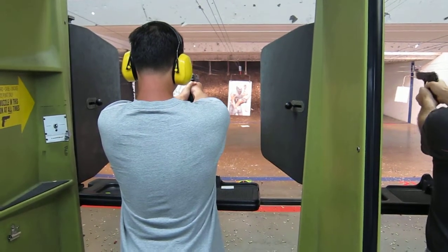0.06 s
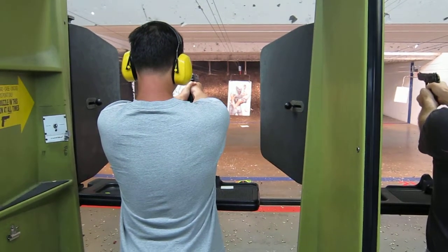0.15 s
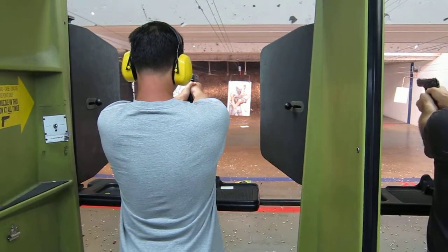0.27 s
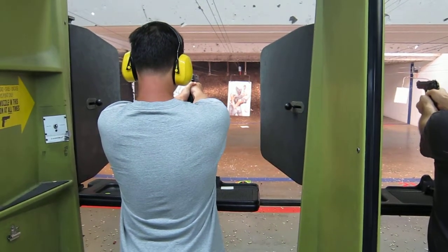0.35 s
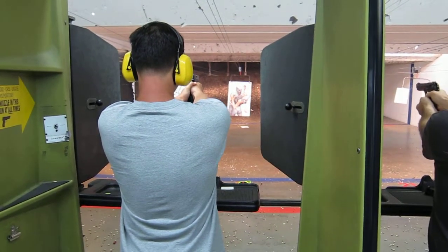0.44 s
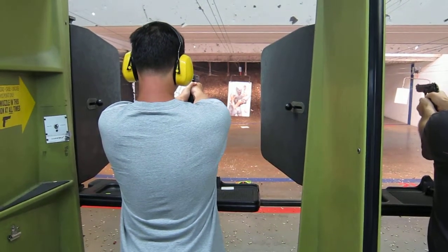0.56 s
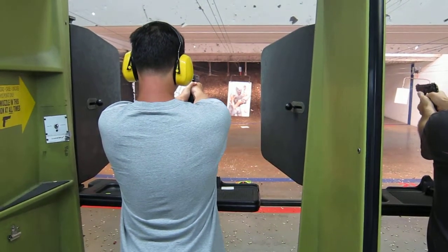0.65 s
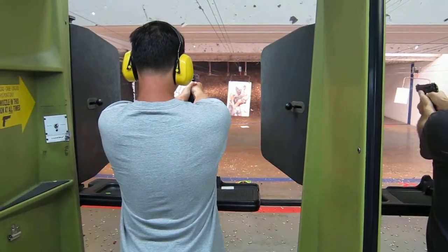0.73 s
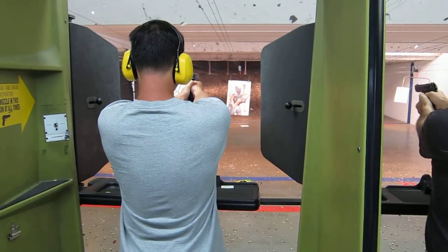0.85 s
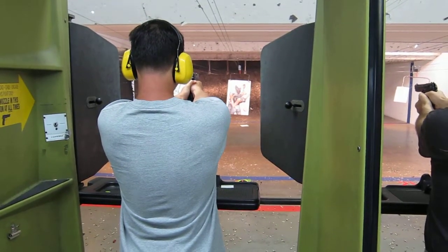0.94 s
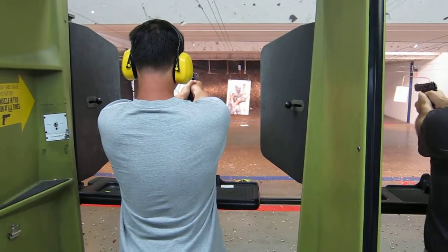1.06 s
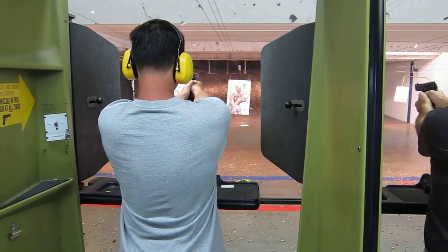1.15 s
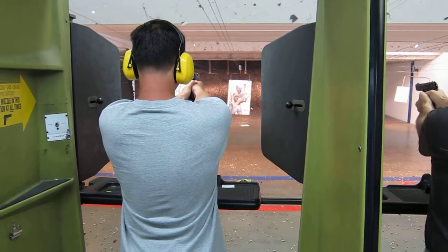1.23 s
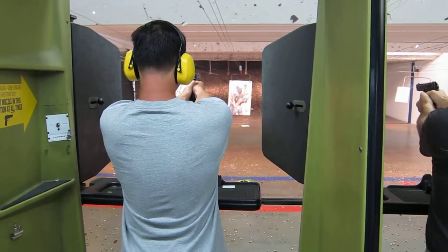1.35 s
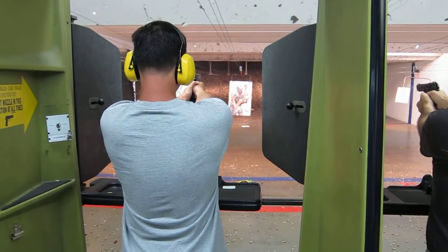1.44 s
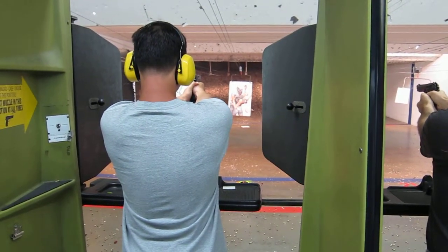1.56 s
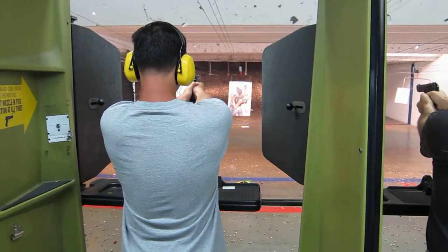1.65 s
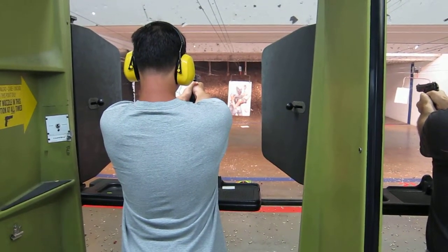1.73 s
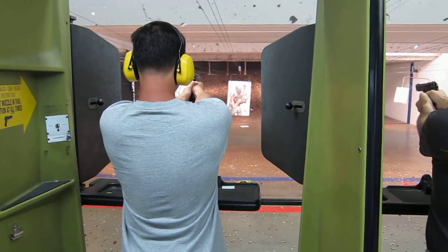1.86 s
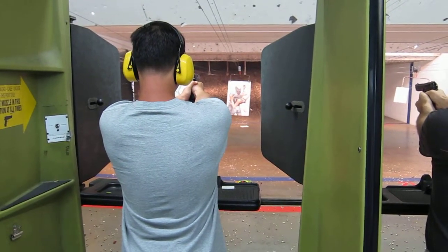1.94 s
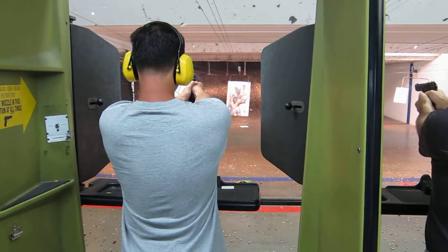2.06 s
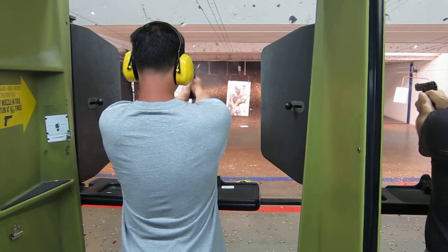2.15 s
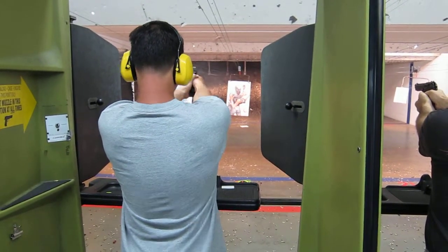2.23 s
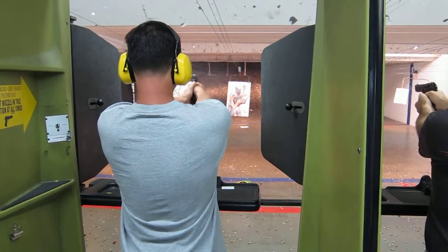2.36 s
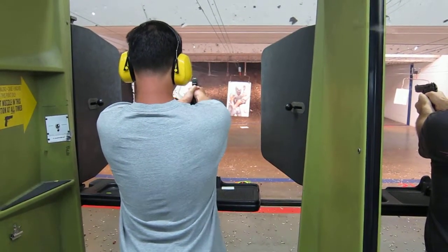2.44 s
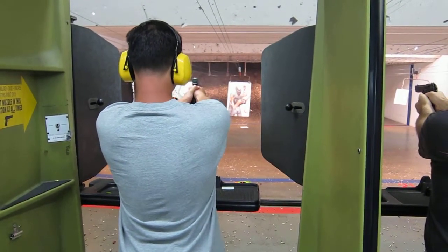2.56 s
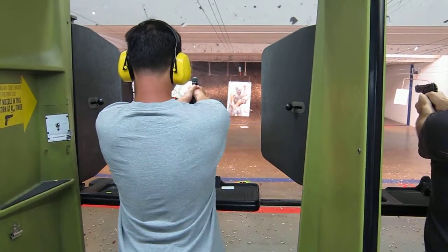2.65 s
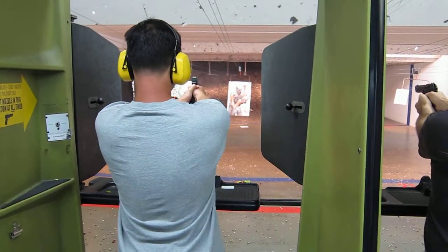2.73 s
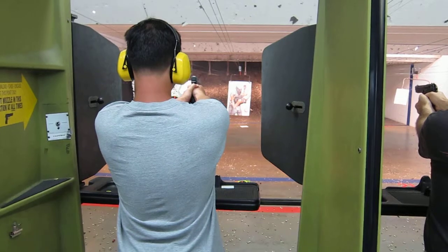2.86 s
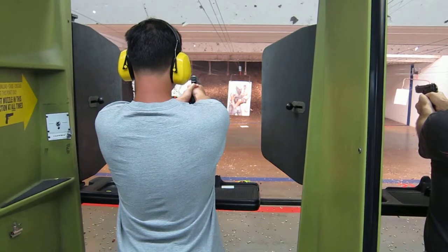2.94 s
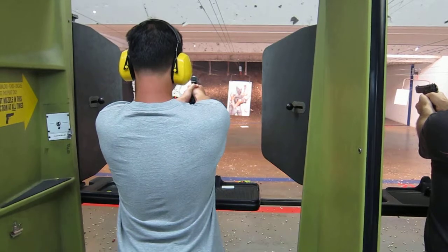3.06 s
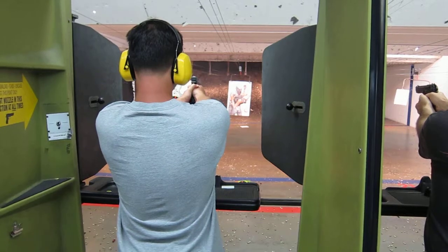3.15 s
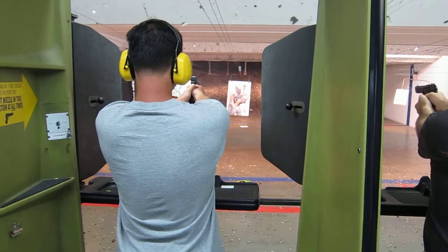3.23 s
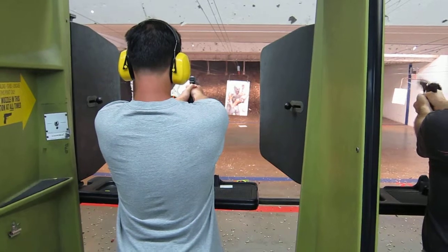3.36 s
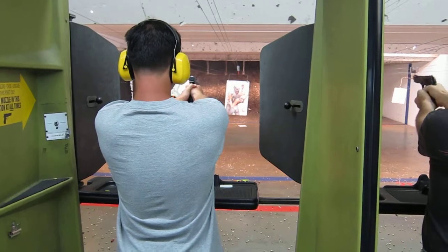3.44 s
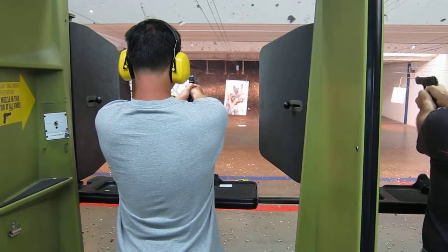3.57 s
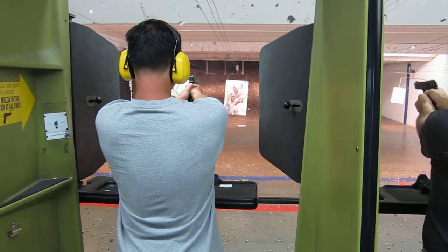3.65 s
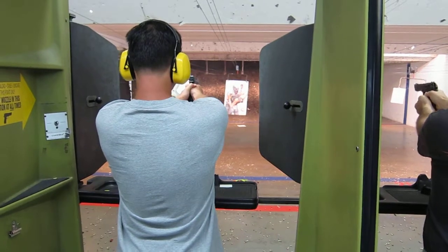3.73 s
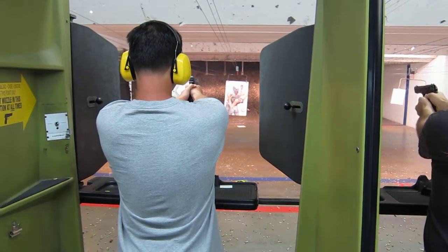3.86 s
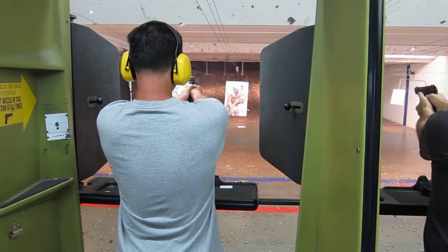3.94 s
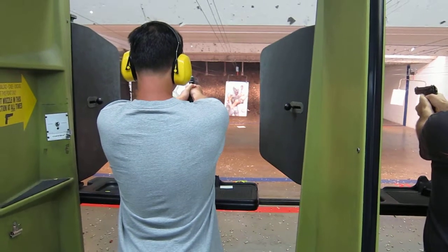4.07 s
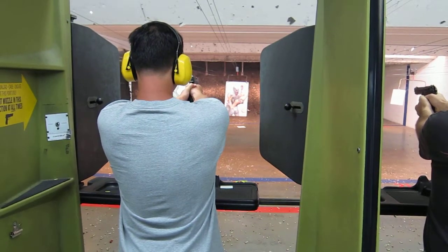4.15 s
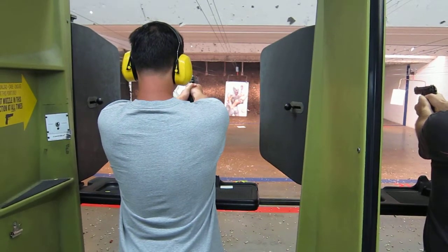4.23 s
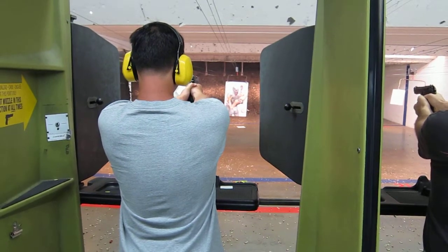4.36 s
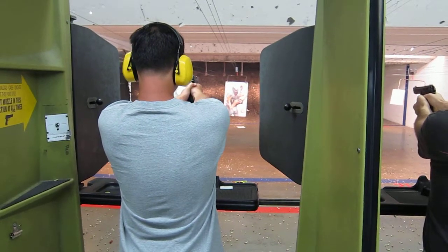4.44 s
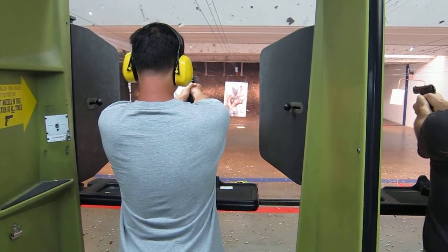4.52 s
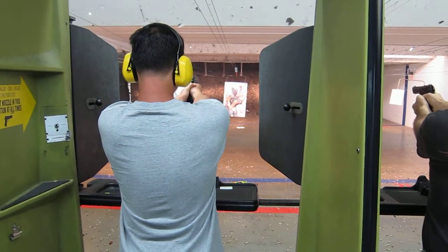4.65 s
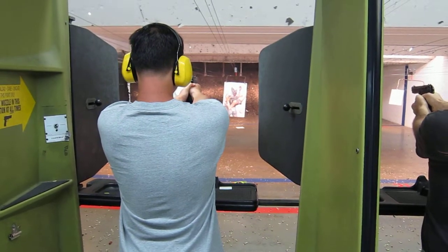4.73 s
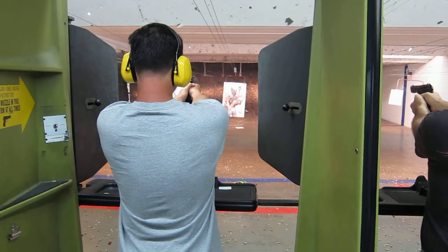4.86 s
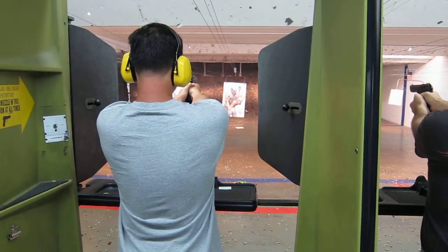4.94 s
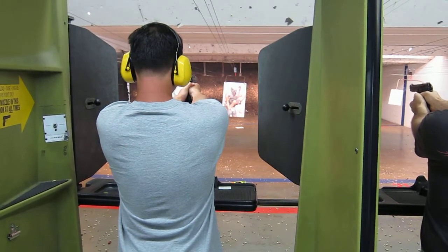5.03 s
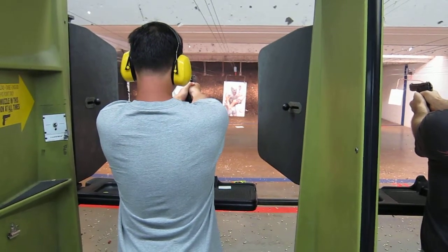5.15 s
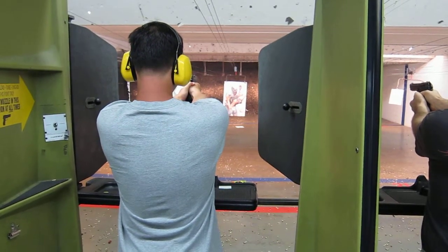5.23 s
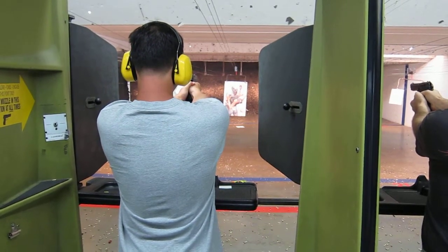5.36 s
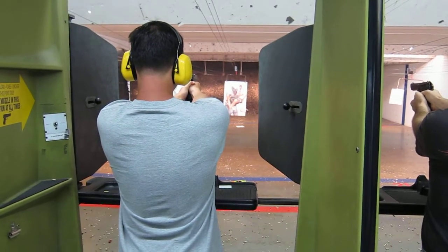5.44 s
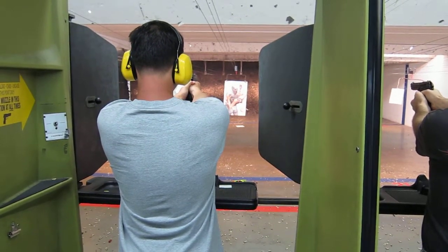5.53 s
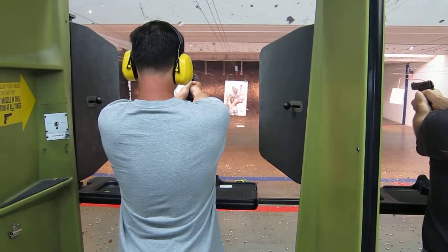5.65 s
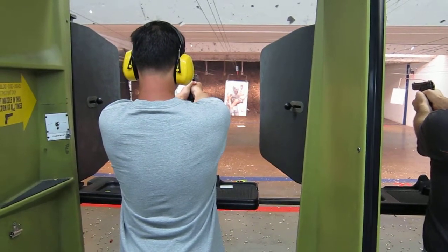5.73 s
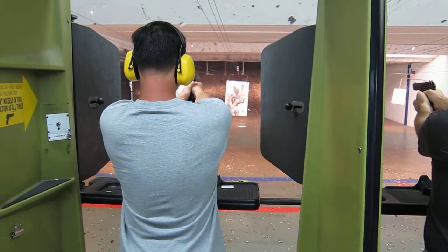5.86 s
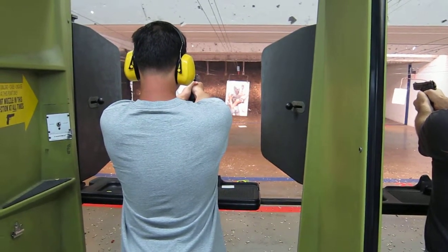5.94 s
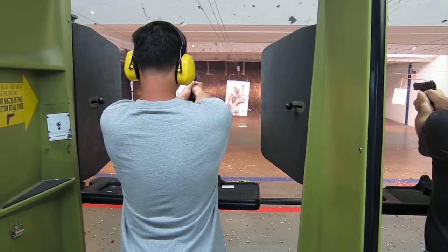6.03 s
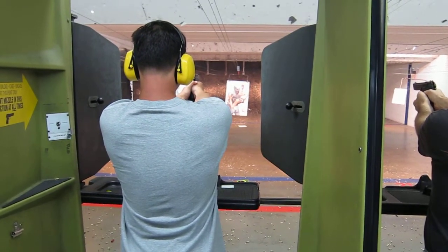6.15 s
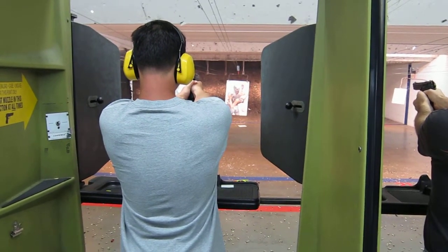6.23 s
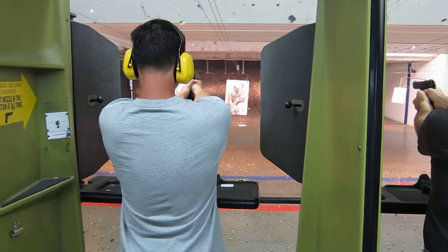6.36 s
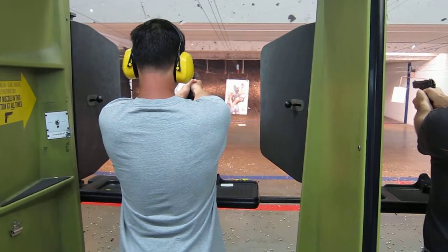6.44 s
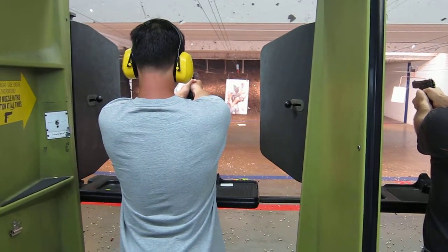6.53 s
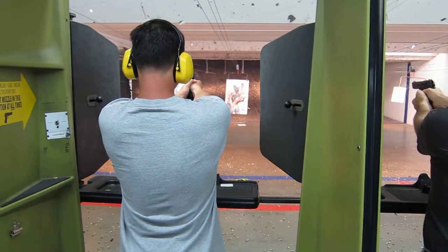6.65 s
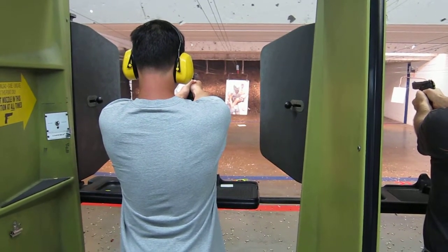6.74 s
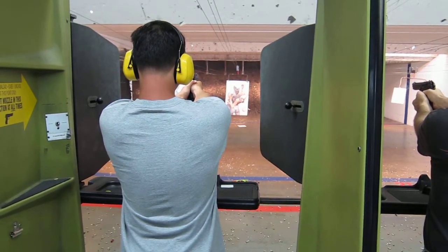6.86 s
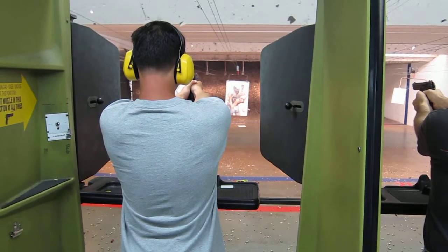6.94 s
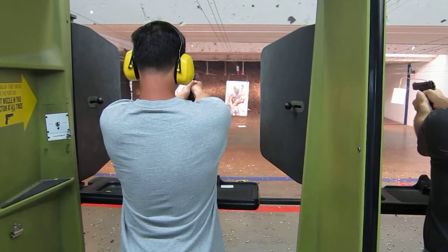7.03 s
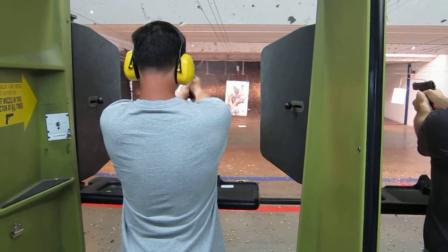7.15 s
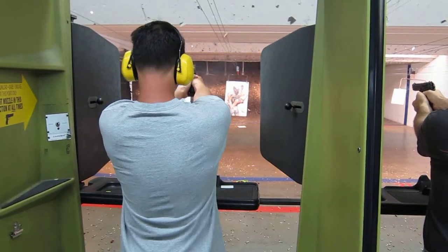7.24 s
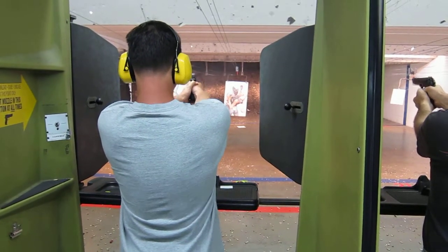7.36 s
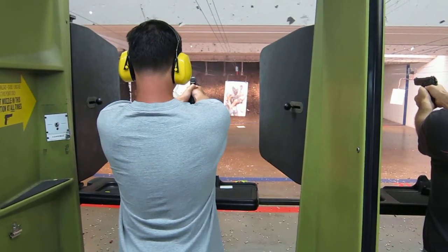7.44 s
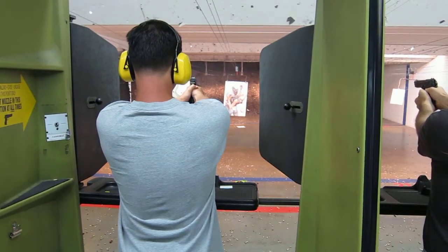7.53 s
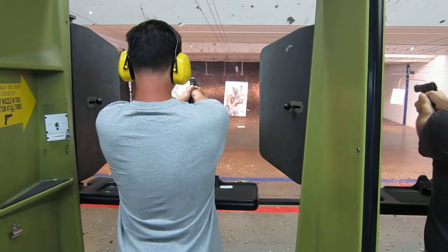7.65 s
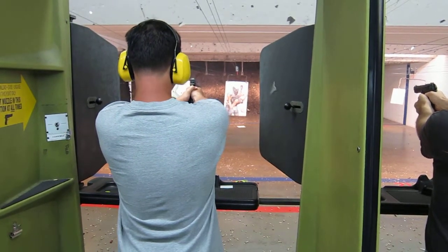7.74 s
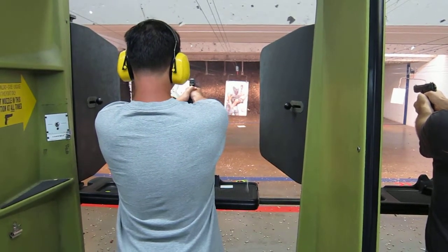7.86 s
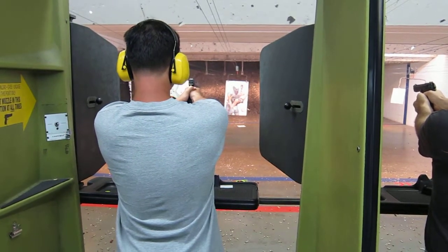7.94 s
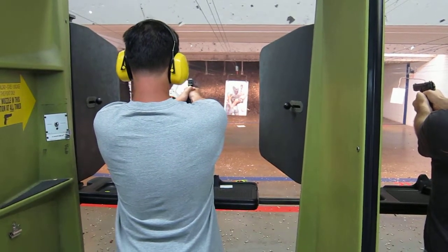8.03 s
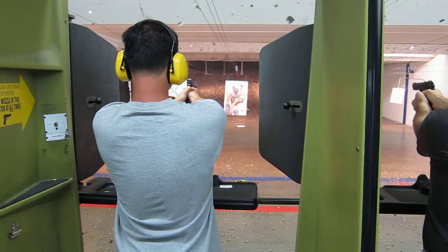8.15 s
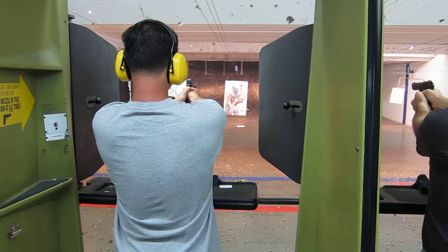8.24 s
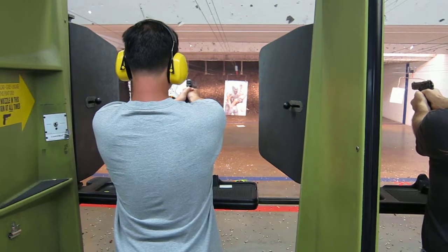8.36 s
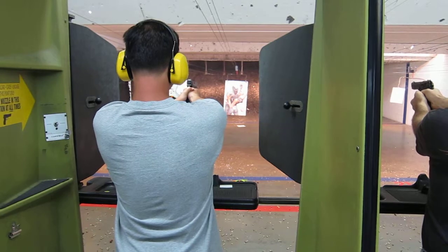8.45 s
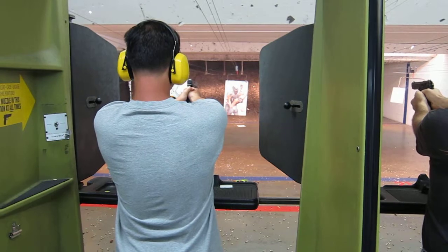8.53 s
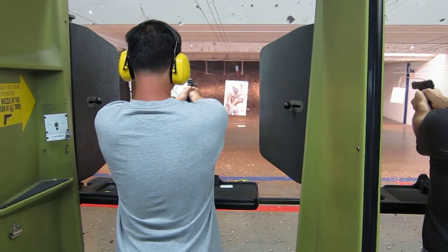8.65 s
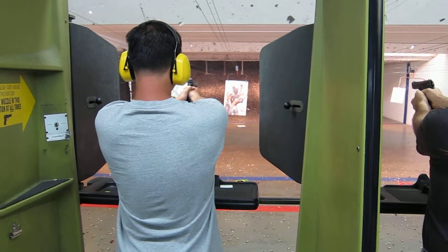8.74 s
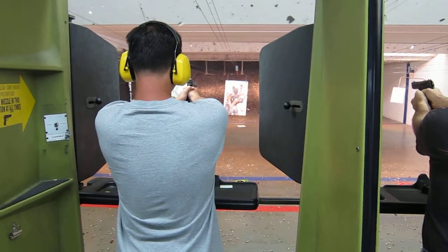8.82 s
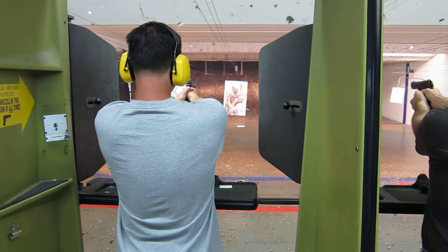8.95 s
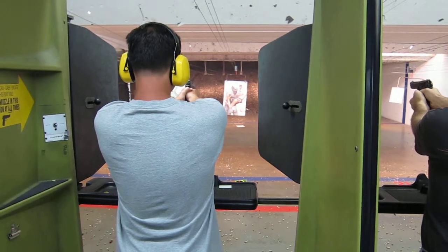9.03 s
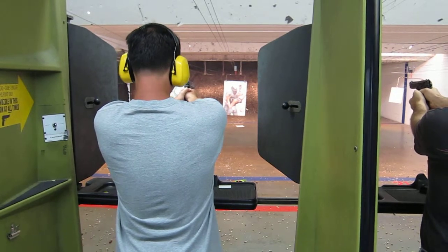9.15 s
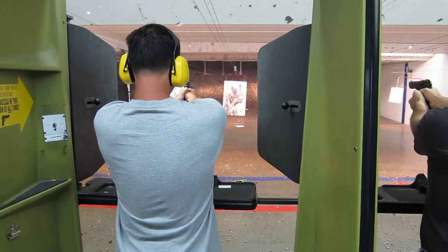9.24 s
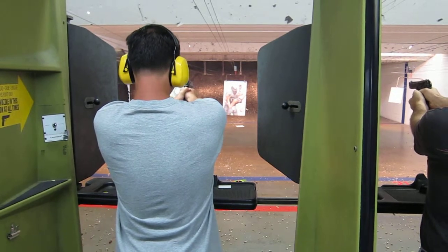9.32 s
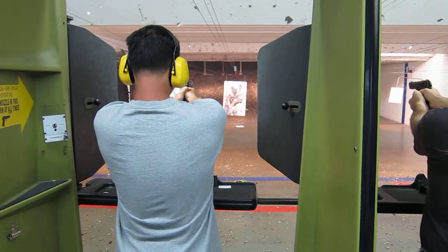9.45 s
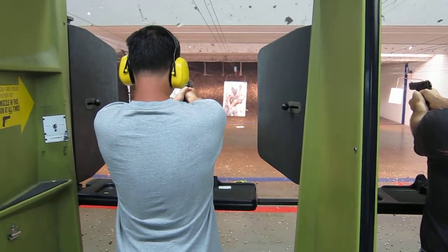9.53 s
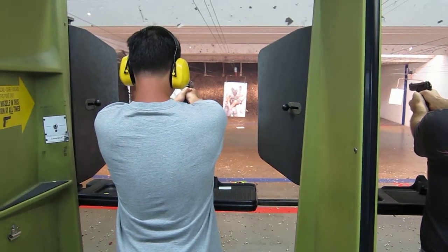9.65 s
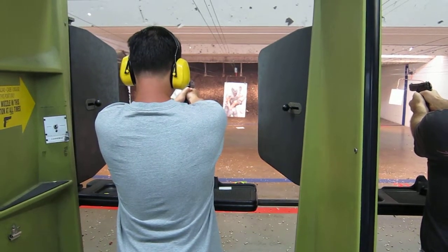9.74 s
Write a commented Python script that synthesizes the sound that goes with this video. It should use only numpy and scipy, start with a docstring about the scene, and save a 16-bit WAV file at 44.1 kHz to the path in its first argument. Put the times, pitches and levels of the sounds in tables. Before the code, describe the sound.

Saturated gunshots, two in close pairs, boom and ring through a hard hall over ventilation hum, spent cases ticking, a clunk and a motor whir.

```python
"""The hall is already roaring from a pistol shot as we join, just behind one booth of a concrete indoor range.
Each blast is a shock pulse, bursts of shaped noise off the booth, and a hall tail dying at two speeds.
Steady noise and a fan tone make the ventilation; spent brass ticks and rings on the floor and knocks the booth.
Something clunks, a low motor hums, and a target carrier whirs up to speed as noise and unsteady tones.
Loud peaks saturate the microphone, and its gain ducks and creeps back."""
import sys
import numpy as np
from scipy import signal
from scipy.fft import rfft, irfft, next_fast_len
from scipy.io import wavfile

SR = 44100
rng = np.random.default_rng(int(sys.argv[2]) if len(sys.argv) > 2 else 0)


def unload_audio(sound):
    """Save the sound as a 16-bit wav file, at the path given as the first command line argument."""
    columns = np.transpose(np.atleast_2d(sound))
    # keep every value between -1 and 1, then stretch to whole-number steps
    steps = np.round(np.clip(columns, -1, 1) * 32767)
    wavfile.write(sys.argv[1], SR, steps.astype(np.int16))


N = 431738

# Pistol shots: (time [s], muzzle blast [dB], crack off the booth [dB], hall roar [dB], lingering echo [dB])
SHOTS = [(-.06, 6, 18, 11.5, -7.5), (2.1569, 14, 18, 10.5, -4.5), (3.3852, -1, 23, 11.5, -10.5),
         (3.56, -6, 7, 10.5, -8.5), (7.1653, 6, 25.5, 9.5, -11), (7.335, 4, 22, 8, -1),
         (9.6844, 18, -2, 10, -12)]
# Colour of a shot's first reflections: (frequency [Hz], relative level [dB per Hz])
CRACK_SPECTRUM = [(300, -20), (1200, -19), (2500, -5), (4000, 1), (7000, -2.5), (12000, -13), (16000, -9)]
# Colour of the booth's clatter: (frequency [Hz], relative level [dB per Hz])
BOOTH_SPECTRUM = [(30, -13), (150, -0.5), (400, 0), (900, 4), (1700, -1), (3500, 0), (6500, -1),
                  (11000, -27), (16000, -15.5)]
# Colour of the hall: (frequency [Hz], relative level [dB per Hz])
HALL_SPECTRUM = [(25, -25), (100, -22.5), (200, -11), (330, -2.5), (500, -3.5), (750, -1.5), (1000, -4),
                 (1300, -5.5), (1680, -12), (2050, -12), (2500, -9), (4000, -10), (6000, -11), (10000, -24),
                 (16000, -28.5)]
# Decay of the hall's roar: (frequency [Hz], t60 [s])
ROAR_T60 = [(60, 2.25), (300, 2.086), (800, 1.96), (2000, 1.756), (4000, 1.54), (6500, 1.37), (12000, 0.99)]
# Decay of the echo that lingers down range: (frequency [Hz], t60 [s])
LINGER_T60 = [(60, 5), (350, 4.8), (900, 4.67), (2000, 3.57), (4000, 2.72), (7000, 1.36), (12000, .8)]
# Standing waves between the walls: (frequency [Hz], width [Hz], level over the echo [dB])
STANDING_WAVES = [(274.6, 3.6, 7.5), (367.4, 6.7, 8.5), (643.5, 12, 0.5)]
# Left-right likeness of diffuse sound: (frequency [Hz], coherence [-1 to 1])
COHERENCE = [(40, 0.96), (130, 1), (300, 0.99), (690, 0.95), (1030, 0.87), (1400, 0.6), (2000, 0.37),
             (3400, 0.087), (6000, -0.1), (12000, -0.11)]
# Colour of the ventilation: (frequency [Hz], relative level [dB per Hz])
VENT_SPECTRUM = [(25, -7), (60, -13), (140, -10.5), (380, -11), (700, -14.5), (1000, -18.5), (1650, -23),
                 (2200, -23), (3100, -30.5), (5700, -35.5), (10000, -46.5), (16000, -60)]
# Spent cases landing on concrete: (time [s], tick level [dB], ring frequency [Hz], ring level [dB])
LANDINGS = [(.778, -40, 10500, -29.5), (1.132, -36, 10500, -41), (1.423, -51, 10500, -50),
            (4.36, -72, 7270, -42), (4.391, -64, 10900, -43), (4.548, -63, 11400, -48),
            (4.896, -62, 10050, -55), (5.248, -66, 11400, -53), (5.32, -72, 7620, -55),
            (5.525, -66, 11450, -51), (6.528, -72, 13260, -64), (6.679, -64, 9990, -57),
            (8.093, -32, 10500, -33), (8.246, -37, 10900, -23.5), (8.45, -35, 11000, -49),
            (8.623, -24, 10650, -27), (8.852, -46, 10900, -39), (8.94, -58, 10620, -41)]
# Colour of brass on concrete: (frequency [Hz], relative level [dB per Hz])
TICK_SPECTRUM = [(2000, -34), (7000, -6), (10000, -9), (13000, -4), (16000, -12)]
# A hard landing stops the ring, a glancing one leaves it free: (tick level [dB], ring t60 [s])
RING_T60 = [(-50, 0.28), (-64, 0.93), (-72, 1.6)]
# Cases against the booth: (time [s], level [dB], pitch of the first knock [Hz], rattle length [s])
KNOCKS = [(1.132, -40, 5400, .002), (1.316, -39, 5350, .002), (8.245, -12.5, 4830, .002),
          (8.447, -20.5, 4520, .007), (8.603, -24, 4430, .027), (8.852, -31, 5160, .002)]
# Colour of a knock's click: (frequency [Hz], relative level [dB per Hz])
KNOCK_SPECTRUM = [(400, -18), (2000, 7), (4500, 4.5), (7000, -2.5), (11000, -19), (16000, -13)]
# Notes of the rolling cases, which touch in turn: (frequency [Hz])
ROLL_NOTES = [11080, 9950, 7600, 13350, 10020, 13300]
# Colour of the clunk: (frequency [Hz], relative level [dB per Hz])
CLUNK_SPECTRUM = [(30, -22), (100, -13), (200, -13), (400, -8), (800, -21), (1400, -11.5), (3000, -19),
                  (6000, -21), (11000, -30.5), (16000, -40)]
# The metal fitting that the clunk rings: (frequency [Hz], level before a 3 dB cut [dB], t60 [s])
FITTING_MODES = [(155, -38, 0.75), (220, -27.5, 0.35), (1040, -49, .3), (1270, -50, .25), (1820, -50, .35),
                 (3260, -41.5, 0.96)]
# Runs of the low motor: (start time [s], hold [s], level [dB])
HUM_RUNS = [(6.49, 0.11, -44), (9.2, .35, -44.5)]
# Colour of the carrier's whir: (frequency [Hz], relative level [dB per Hz])
WHIR_SPECTRUM = [(100, -4.5), (400, -9), (1500, -5), (2500, -6), (4500, -6.5), (5700, -7), (7500, -14.5),
                 (12000, -16), (16000, -22)]
# Tones of the carrier's wheels and motor: (frequency [Hz], level against the whir [dB])
WHINE_TONES = [(366, -22), (678, -11.5), (2110, -19), (2557, -23), (5690, -19)]
# Tone of the microphone chain: (frequency [Hz], gain [dB])
MICROPHONE_TONE = [(20, -10), (60, 1.0), (300, 0.5), (1000, 1.5), (1700, 0.5), (3500, -0.5),
                   (7000, -6.5), (11000, -0.5), (16000, -6)]

DIRECT_DB, DIRECT_T60 = 8.5, 0.005  # direct crack against its reflections [dB], its decay [s]
BOOTH_DB = 2  # the booth's clatter against the hall's roar [dB]
HOP_S, HOP_RING_LOSS_DB, HOP_TICK_LOSS_DB = .18, 16.5, 20  # typical delay and losses of a case's one hop
RATTLE_GAP_S, RATTLE_SPREAD_OCT = .004, 0.17  # contacts within a rattle, and how far their pitch strays
ROLL_START_S, ROLL_END_S, ROLL_GAP_S = 3.9, 6.05, .2  # span of the rolling, and typical gap between touches
ROLL_TICK_DB, ROLL_RING_DB, ROLL_SCATTER_DB = -72, -67, 5  # one touch, its ring scattered up or down
HUM_ATTACK_S, HUM_RELEASE_T60 = 0.043, 1.7  # the motor starts quickly and runs down slowly [s]
CARRIER_START_S, CARRIER_SPIN_UP_S, CARRIER_DB = 8.745, 0.2, -28.5
TOP_HZ = 16100  # upper edge of the microphone chain


def amp(db):
    """Decibels to amplitude."""
    return 10 ** (np.asarray(db) / 20)


def unit(x):
    """Scale to rms 1."""
    return x / np.sqrt(np.mean(x ** 2) + 1e-20)


def along(points, hz):
    """Read (frequency, value) points on a log frequency axis."""
    f, v = np.transpose(points)
    return np.interp(np.log(hz + 1), np.log(f + 1), v)


def clock(count):
    """Seconds of each sample."""
    return np.arange(count) / SR


def filtered(x, response):
    """Shape x by a response given as a function of frequency."""
    n = x.shape[-1]
    m = next_fast_len(n + 8192, True)  # zero padding keeps the filter's ringing off the start
    return irfft(rfft(x, m) * response(np.fft.rfftfreq(m, 1 / SR)), m)[..., :n]


def add(track, s, sound):
    """Mix a sound in from time s, trimming what falls outside the track."""
    start = round(s * SR)
    part = sound[..., max(-start, 0):N - start]
    track[:, max(start, 0):][:, :part.shape[-1]] += part


def diffuse(spectrum, count):
    """Stereo noise of rms 1, arriving from all sides: mid and side balanced to give the coherence."""
    def mid_side_colour(hz):
        angle = np.arccos(np.clip(along(COHERENCE, hz), -1, .995)) / 2
        return amp(along(spectrum, hz)) * np.array([np.cos(angle), np.sin(angle)])

    mid, side = filtered(rng.standard_normal((2, count)), mid_side_colour)
    return unit(np.array([mid + side, mid - side]))


def fade(t, t60):
    """Exponential decay, 60 dB down after t60 seconds."""
    return np.exp(-np.log(1000) * t / t60)


def dying(x, t60s):
    """Each frequency of x dies at its own speed."""
    hz, t, z = signal.stft(x.astype(np.float32), SR, nperseg=512)
    decayed = z * fade(t, along(t60s, hz)[:, None])
    return signal.istft(decayed, SR)[1][:, :x.shape[-1]]


def wavering(hz, width_hz, count):
    """An unsteady tone of rms 1, narrow-band noise unrelated at the two ports."""
    noise = rng.standard_normal((2, count))
    return unit(filtered(noise, lambda f: 1 / (1 + ((f - hz) / width_hz) ** 2)))


def standing_waves(hz):
    """Narrow resonances of the hall on top of a flat response."""
    return 1 + sum(amp(db) * 1j * hz * width / (centre ** 2 - hz ** 2 + 1j * hz * width)
                   for centre, width, db in STANDING_WAVES)


def muzzle_blast(push_s):
    """A shock front and the suction behind it."""
    u = clock(SR // 20) / push_s
    return (1 - u) * np.exp(-u)


def shots():
    """Each blast cracks and clatters round the booth, then the hall swells and dies away at two speeds."""
    out, t = np.zeros((2, N)), clock(4 * SR)
    near = t[:SR]
    crack_shape = (1 - np.exp(-near / 0.00092)) * (fade(near, t60=0.013) + amp(-7.5) * fade(near, t60=0.088))
    clatter_shape = (1 - np.exp(-near / 0.0054)) * fade(near, t60=0.53)
    swell = (1 - np.exp(-t / 0.089)) ** 0.96
    for s, blast_db, crack_db, roar_db, linger_db in SHOTS:
        crack = diffuse(CRACK_SPECTRUM, len(near))
        add(out, s - .002, amp(-18) * fade(near, t60=.03) * crack)  # a faint snap just ahead of the shock
        add(out, s, -amp(blast_db) * muzzle_blast(push_s=0.00027))
        # straight from the muzzle, alike at both ports
        add(out, s, amp(crack_db + DIRECT_DB) * fade(near, DIRECT_T60) * crack[:1])
        add(out, s, amp(crack_db) * crack_shape * crack)
        clatter = clatter_shape * diffuse(BOOTH_SPECTRUM, len(near))
        add(out, s, amp(roar_db + BOOTH_DB) * clatter)
        roar = amp(roar_db) * dying(diffuse(HALL_SPECTRUM, len(t)), ROAR_T60)
        resonant = filtered(diffuse(HALL_SPECTRUM, len(t)), standing_waves)
        linger = amp(linger_db) * dying(resonant, LINGER_T60)
        add(out, s, swell * (roar + linger))
    return out


def drone(hz):
    """A rotating machine's hum: a steady sine with a wavering tone beside it."""
    return np.sin(2 * np.pi * hz * clock(N)) + .5 * wavering(hz, width_hz=2, count=N)[0]


def ventilation():
    """Steady diffuse air noise with the fan's tone in it."""
    return amp(-41.5) * diffuse(VENT_SPECTRUM, N) + amp(-51.5) * drone(260)


def cases():
    """A case ticks where it lands and hops once; its slightly oval mouth rings as a beating pair of modes."""
    out, t = np.zeros((2, N)), clock(SR)
    contact = fade(t, t60=0.074) + amp(-15) * fade(t, t60=.33)  # the hit and its echo in the booth
    for s, tick_db, hz, ring_db in LANDINGS + rolling():
        tick = amp(tick_db) * contact * diffuse(TICK_SPECTRUM, SR)
        t60 = np.interp(tick_db, *np.transpose(sorted(RING_T60)))
        split_hz = rng.uniform(25, 80)
        phase = rng.uniform(0, 2 * np.pi, (2, 2, 1))
        lower = np.sin(2 * np.pi * hz * t + phase[0])
        upper = 1.6 * np.sin(2 * np.pi * (hz + split_hz) * t + phase[1])
        # the tumbling case keeps grazing the floor, which roughens the note
        grazing = .65 * wavering(hz, width_hz=100, count=SR)
        ring = amp(ring_db) * fade(t, t60) * (lower + upper + grazing) / np.sqrt(2)
        add(out, s, tick + ring)
        hop = amp(-HOP_TICK_LOSS_DB) * tick + amp(-HOP_RING_LOSS_DB) * ring
        add(out, s + HOP_S * rng.uniform(.85, 1.15), hop)
    return out


def knocks():
    """Brass on a well damped panel: click, short ping and echo; a rattle repeats them at straying pitches."""
    out, t = np.zeros((2, N)), clock(SR // 2)
    click = amp(5.5) * fade(t, t60=0.0088) + amp(-8.5) * fade(t, t60=0.46)  # the hit and its echo
    ping = amp(6.0) * fade(t, t60=.02)
    for s, db, first_hz, rattle_s in KNOCKS:
        for delay in np.arange(0, rattle_s, RATTLE_GAP_S):
            stray_oct = RATTLE_SPREAD_OCT * rng.standard_normal() * (delay > 0)
            hz = first_hz * 2 ** stray_oct
            note = np.sin(2 * np.pi * hz * t + rng.normal(0, 0.49, (2, 1)))
            add(out, s + delay, amp(db) * (click * diffuse(KNOCK_SPECTRUM, len(t)) + ping * note))
    return out


def rolling():
    """Faint touches of cases rolling on the floor at uneven gaps, as rows like those of a landing."""
    times = np.arange(ROLL_START_S, ROLL_END_S, ROLL_GAP_S)
    notes = np.resize(ROLL_NOTES, len(times))
    chance = rng.uniform(-1, 1, (len(times), 2))
    return [(s + ROLL_GAP_S * late / 2, ROLL_TICK_DB, hz, ROLL_RING_DB + ROLL_SCATTER_DB * louder)
            for s, hz, (late, louder) in zip(times, notes, chance)]


def clunk():
    """A hard clunk in a nearby booth rattles a metal fitting, with a little of the hall behind it."""
    out, t = np.zeros((2, N)), clock(SR)
    decay = fade(t, t60=0.13) + amp(-8) * fade(t, t60=1.0)  # the booth, then the hall
    rattle = amp(-26) * decay * diffuse(CLUNK_SPECTRUM, SR)
    ring = sum(amp(db - 3.0) * fade(t, t60) * wavering(hz, width_hz=hz / 45, count=SR)[0]
               for hz, db, t60 in FITTING_MODES)
    add(out, 6.131, (1 - np.exp(-t / 0.0042)) * (rattle + ring))
    return out


def motor_hum():
    """A low motor hum whose level rises quickly, holds, and dies slowly in each run."""
    t = clock(N)
    level = np.zeros(N)
    for start_s, hold_s, db in HUM_RUNS:
        attack = np.clip((t - start_s) / HUM_ATTACK_S, 0, 1)
        release = fade(np.maximum(t - start_s - hold_s, 0), HUM_RELEASE_T60)
        level += amp(db) * attack * release
    return level * drone(135)


def carrier():
    """A target carrier starts along its wire: whir and whine swell as it gathers speed, then hold steady."""
    speed = 1 - np.exp(-np.maximum(clock(N) - CARRIER_START_S, 0) / CARRIER_SPIN_UP_S)
    whine = sum(amp(db) * wavering(hz, width_hz=12 + hz / 130, count=N)[0] for hz, db in WHINE_TONES)
    return amp(CARRIER_DB) * speed * (diffuse(WHIR_SPECTRUM, N) + whine)


def scene():
    """Everything reaches the left port a little louder."""
    lean_db = 0.78  # up on the left, down on the right
    mix = shots() + ventilation() + cases() + knocks() + clunk() + motor_hum() + carrier()
    return mix * amp([[lean_db], [-lean_db]])


def overload(x, top, hardness):
    """Peaks flatten softly at top."""
    return x / (1 + np.abs(x / top) ** hardness) ** (1 / hardness)


def gain_control(x, limit_db, attack_s, release_db):
    """The gain drops fast on peaks over the limit and creeps back by release_db a second."""
    over = np.maximum(20 * np.log10(np.abs(x).max(0) + 1e-9) - limit_db, 0)
    creep = release_db * clock(N)
    cut = np.maximum.accumulate(over + creep) - creep
    pole = np.exp(-1 / (attack_s * SR))
    # smoothing starts from the first cut, so the gain opens already ducked
    smooth_cut = cut[0] + signal.lfilter([1 - pole], [1, -pole], cut - cut[0])
    return x * amp(-smooth_cut)


def record(dry):
    """The microphone saturates, the gain ducks, and its chain adds a tone, a treble notch and a band limit."""
    bent = overload(dry, top=0.96, hardness=5.2)
    ducked = gain_control(bent, limit_db=-9, attack_s=0.0034, release_db=3.5)
    coloured = filtered(ducked, lambda hz: amp(along(MICROPHONE_TONE, hz)))
    notch = signal.tf2sos(*signal.iirnotch(8230, 9, SR))  # centre [Hz], Q
    notched = signal.sosfilt(np.vstack([notch, notch]), coloured)
    clipped = np.clip(notched, -1, 1)
    return filtered(clipped, lambda hz: np.clip((TOP_HZ - hz) / 300, 0, 1))


dry = scene()
out = record(dry)
unload_audio(out)
```